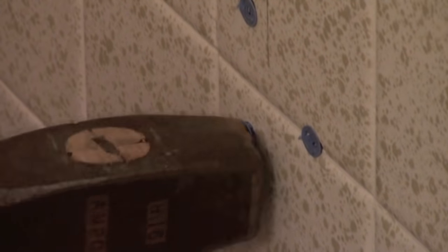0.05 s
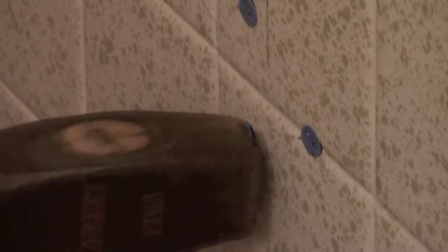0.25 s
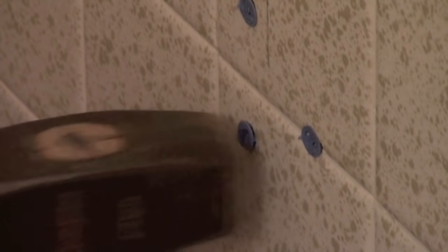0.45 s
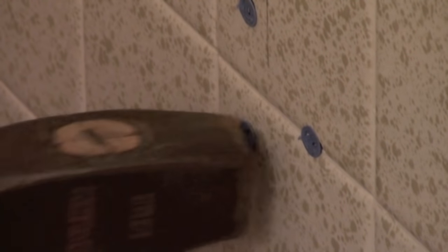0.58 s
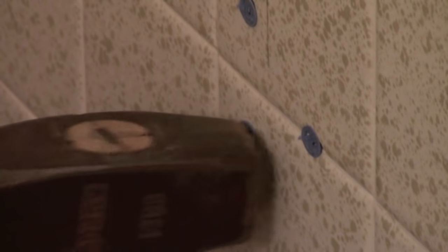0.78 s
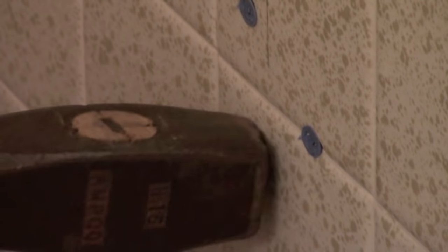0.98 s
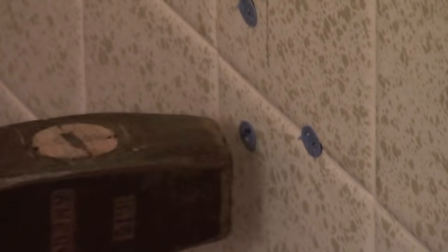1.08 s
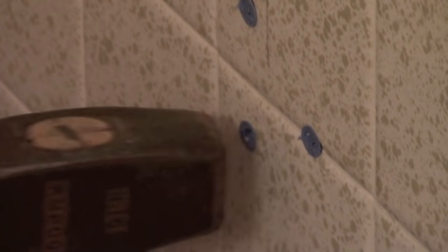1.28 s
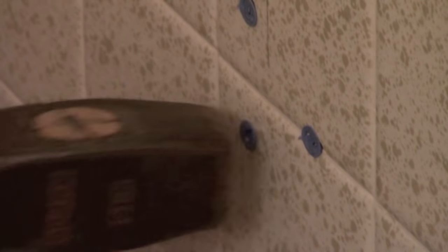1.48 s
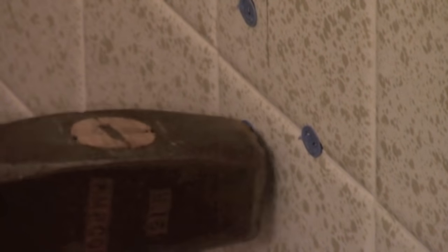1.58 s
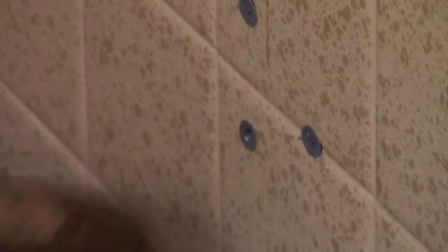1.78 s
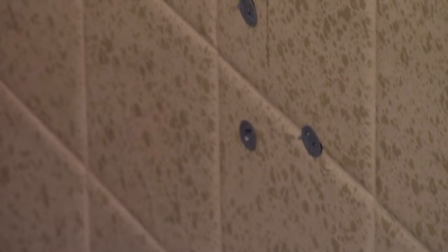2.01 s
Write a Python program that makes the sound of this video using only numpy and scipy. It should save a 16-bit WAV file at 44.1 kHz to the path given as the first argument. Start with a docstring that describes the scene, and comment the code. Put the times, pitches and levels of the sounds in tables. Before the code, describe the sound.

A steel hammer taps a plastic anchor into a tiled wall, eight quick, evenly spaced blows that grow fuller as it seats. Each knock sounds close and rings briefly in a small, hard bathroom.

```python
"""A steel hammer taps a plastic anchor into a tiled bathroom wall, about four and a half blows a second.
Each impact excites the same damped modes of the wall and the same echoes, standing waves and
reverberation of a small hard room; as the anchor seats, the knock grows fuller. The first blow is heard
only dying away. Under it all lie a low rumble and a faint hiss, with two tiny clicks and a last rustle."""
import sys
import numpy as np
from scipy import signal
from scipy.fft import rfft, irfft
from scipy.io import wavfile

SR = 44100
rng = np.random.default_rng(int(sys.argv[2]) if len(sys.argv) > 2 else 0)


def file_out(sig):
    """Save sig as 16-bit WAV at sys.argv[1]."""
    # one column per channel
    cols = np.atleast_2d(sig).T
    # limit, then scale
    lim = np.clip(cols, -1, 1)
    pcm = np.round(lim * 32767).astype(np.int16)
    wavfile.write(sys.argv[1], SR, pcm)


N = 90404
RING_S = .9  # time allowed for one event to die away
THIRD_OCTAVES_HZ = 20 * 2 ** (np.arange(30) / 3)


def undb(db):
    """Amplitude ratio of a level: tenfold for every 20 dB."""
    return 10 ** (np.asarray(db) / 20)


def curve_at(hz, points, values):
    """Interpolation along a logarithmic frequency axis."""
    return np.interp(np.log(np.maximum(hz, 1)), np.log(points), values)


def butter(x, hz, kind, order=2):
    """Maximally flat low-, high- or band-pass filtering."""
    return signal.sosfilt(signal.butter(order, hz, kind, fs=SR, output="sos"), x)


def band_noise(hz, size):
    """Band-limited noise: a third octave around hz, with rms 1."""
    octaves = np.log2(np.maximum(np.fft.rfftfreq(size, 1 / SR), 1) / hz)
    shape = np.cos(np.pi / 2 * np.clip(3 * octaves, -1, 1))
    band = irfft(rfft(rng.standard_normal(size)) * shape, size)
    return band / band.std()


def colour(x, hz, db):
    """Minimum-phase filtering: folding the cepstrum makes the gain curve (hz, db) causal."""
    size = 2 * len(x)
    gain = undb(curve_at(np.fft.rfftfreq(size, 1 / SR), hz, db))
    cepstrum = irfft(np.log(gain))
    cepstrum[1:len(x)] *= 2
    cepstrum[len(x) + 1:] = 0
    return irfft(rfft(x, size) * np.exp(rfft(cepstrum)))[:len(x)]


def fade(t, t60):
    """Exponential damping: 60 dB in t60 seconds."""
    return undb(-60 * t / t60)


def ring(t, modes):
    """Free vibration as a sum of damped normal modes."""
    return sum(undb(db) * fade(t, t60) * np.sin(2 * np.pi * hz * t) for hz, db, t60 in modes)


def burst(t, decay_s):
    """A broadband transient: white noise under exponential decay."""
    return rng.standard_normal(len(t)) * np.exp(-t / decay_s)


def add(out, x, start_s):
    """Superposition of x on out from start_s, which may be negative."""
    i = int(round(start_s * SR))
    x, i = x[max(-i, 0):], max(i, 0)
    out[i:i + len(x)] += x[:len(out) - i]


def struck_wall(t):
    """Impulse response of wall and tile: a pressure swing as they give way, then modal ringing."""
    # modes of wall and tile (frequency [Hz], level [dB], t60 [s])
    wall_modes = [(335, -28.5, .04), (552, -18, 0.035), (609, -7, 0.038), (646.4, -18.5, .1),
                  (823, -30.5, 0.13), (1086, -26.5, 0.12), (1174.4, -25, 0.079), (1620, -33.5, 0.063),
                  (1847, -28.5, .06), (2196, -32, 0.047), (2920, -38.5, 0.14)]
    push_db, push_s = -32.5, 0.0019
    push = undb(push_db) * t / push_s * np.exp(1 - t / push_s)
    return butter(-ring(t, wall_modes) - push, 6800, "low")  # the plastic cushions the blow


def in_room(t, wall):
    """Reflection between facing walls adds standing waves and dull echoes to the direct sound."""
    # standing waves (frequency [Hz], level [dB], t60 [s])
    room_modes = [(47, -26, 0.33), (70.6, -24.5, 0.5), (73.5, -14, 0.075), (127.06, -15.5, 0.45),
                  (141, -12.5, 0.14), (151.76, -21, 0.46), (170.5, -27, 0.49), (219.85, -14.5, 0.38),
                  (255.7, -12, 0.27), (331.6, -20.5, 0.25), (354.5, -22.5, 0.53), (370, -19.5, 0.21),
                  (425.5, -22.5, 0.3), (454.7, -23.5, 0.39), (505, -20, 0.35), (573.7, -21.5, 0.33),
                  (636, -23.5, 0.2), (713.4, -25.5, 0.28), (1020, -25.5, 0.23), (1049.4, -26, 0.3),
                  (1206.4, -23.5, 0.24)]
    # first reflections (delay [s], level [dB])
    echoes = [(.0112, -24.5), (.021, -14.5), (.034, -7)]
    build_s, lag_s = 0.0022, 0.001343
    standing_waves = ring(t, room_modes) * (1 - np.exp(-t / build_s))
    out = wall.copy()
    add(out, standing_waves, lag_s)
    for delay_s, db in echoes:
        add(out, undb(db) * butter(wall, 2160, "low"), delay_s)
    return out


def reverberation(t):
    """Diffuse field: dense reflections between the tiles build and decay at each band's own rate."""
    # reverberant spectrum (frequency [Hz], level per third octave [dB], t60 [s])
    diffuse_field = [(298, -37, 0.57), (400, -29.5, 0.51), (600, -32, 0.5), (875, -24, 0.36),
                     (1124, -30.5, 0.37), (1716, -35, 0.35), (2510, -42, 0.41), (4370, -50, 0.47),
                     (7400, -62, 0.89), (15500, -70.5, 0.89)]
    points, levels, t60s = np.array(diffuse_field).T
    early_db, early_s, build_cycles = 2.5, .06, 3.8
    early_lift = undb(early_db * np.exp(-(t / early_s) ** 2))  # first reflections stand out
    out = 0
    for hz in THIRD_OCTAVES_HZ[THIRD_OCTAVES_HZ > 280]:  # above the lowest standing waves
        build_up = 1 - np.exp(-(t * hz / build_cycles) ** 2)  # the lows fill the room later
        envelope = fade(t, curve_at(hz, points, t60s)) * early_lift * build_up
        band = band_noise(hz, len(t)) * envelope
        band *= np.linalg.norm(envelope) / np.linalg.norm(band)
        out = out + band * undb(curve_at(hz, points, levels))
    return out


def anchor_scrape(t):
    """Sliding friction: a brief hiss of force as the plastic scrapes into its hole."""
    friction = butter(burst(t, decay_s=0.0028), 1300, "high")
    return undb(-6.5) * friction / np.linalg.norm(friction)


def contact_tick(t):
    """A short contact has a wide spectrum: the hammer lands with a bright tick."""
    return undb(-26.5) * butter(burst(t, decay_s=0.0014), [4800, 11000], "band", order=1)


def hammer():
    """Convolution: impact and scrape drive wall and room, coloured by how the anchor gives."""
    # blows (time [s], strength [dB], then relative gains: body [dB], knock [dB], clack [dB],
    # crack [dB], sizzle [dB], tick [dB])
    blows = [(-.075, -6, -7.5, -5, -5, -7, -6, 4.5), (0.1498, -2, -8, -7, 0, 3, -6.5, -4.5),
             (.3720, -1, -0.5, -10, -8, -11, -12, -10), (0.5938, -1, 1, -10, -4, -10, -5.5, -55.5),
             (0.8052, -1, 1.5, -7, 3.5, -6, -2, -3), (1.0247, 1, 2, 0.5, -6, -9.5, -7.5, -24),
             (1.2510, 0, 5.5, 1, -2, -9, -3, -50), (1.4732, 0.5, 4.5, 4, -0.5, -1, -5.5, -54),
             (1.6948, -0.5, 3.5, 5.5, 1, 0, -2, -40)]
    # centres of the thump, body, knock, clack, crack and sizzle bands (frequency [Hz])
    band_centres = [125, 265, 410, 1220, 2250, 5000]
    t, out = np.arange(int(RING_S * SR)) / SR, np.zeros(N)
    response = in_room(t, struck_wall(t)) + reverberation(t)
    for start_s, strength_db, *band_db, tick_db in blows:
        scrape = signal.fftconvolve(response, anchor_scrape(t))[:len(t)]
        blow = colour(response + scrape, band_centres, [0, *band_db])
        tick = undb(tick_db) * contact_tick(t)
        add(out, undb(strength_db) * (blow + tick), start_s)
    return out


def background():
    """Stationary noise: independent bands add in power to a rumble and a hiss."""
    # noise spectrum (frequency [Hz], level per third octave [dB])
    noise_floor = [(20, -49), (45, -45), (80, -69), (130, -54), (300, -66), (1000, -67), (2500, -77.5),
                   (5000, -80.5), (7500, -74.5), (11000, -79.5), (16000, -101)]
    points, levels = np.array(noise_floor).T
    return sum(undb(curve_at(hz, points, levels)) * band_noise(hz, N) for hz in THIRD_OCTAVES_HZ)


def clicks():
    """Two faint stray clicks: fast-decaying transients of bright noise."""
    t, out = np.arange(int(RING_S * SR)) / SR, np.zeros(N)
    for start_s, db in [(0.969, -53.5), (1.803, -50.5)]:
        click = butter(burst(t, decay_s=0.01), [3000, 10000], "band")
        add(out, undb(db) * click, start_s)
    return out


def rustle():
    """Amplitude-modulated noise: a soft rustle swells after the last blow."""
    # envelope (time [s], level [dB])
    swell = [(1.96, -87), (2.03, -57.5), (2.05, -57.5)]
    times, levels = np.array(swell).T
    envelope = undb(np.interp(np.arange(N) / SR, times, levels))
    hiss = butter(rng.standard_normal(N), [500, 8000], "band", order=1)
    return hiss / hiss.std() * envelope


def scene():
    """Superposition: the pressures of all sources add at one point."""
    return (hammer() + clicks() + background() + rustle())[None]


def record(dry):
    """Band limiting: the deepest bass and the highest treble are cut."""
    treble_cut = signal.ellip(8, .2, 70, 15900, fs=SR, output="sos")
    return signal.sosfilt(treble_cut, butter(dry, 8, "high"))


dry = scene()
out = record(dry)
file_out(out)
```